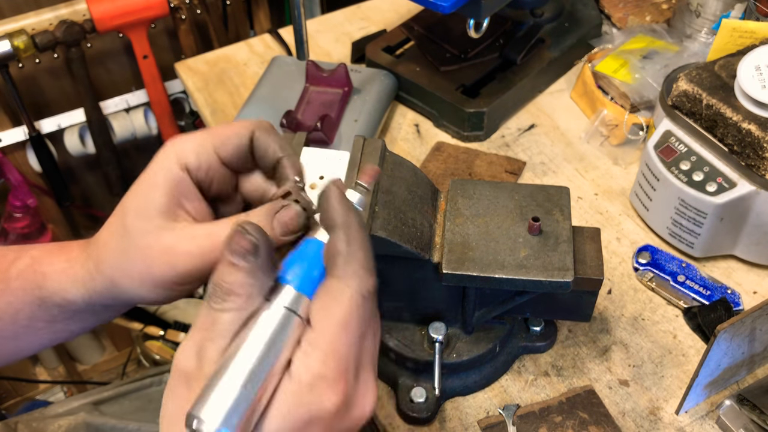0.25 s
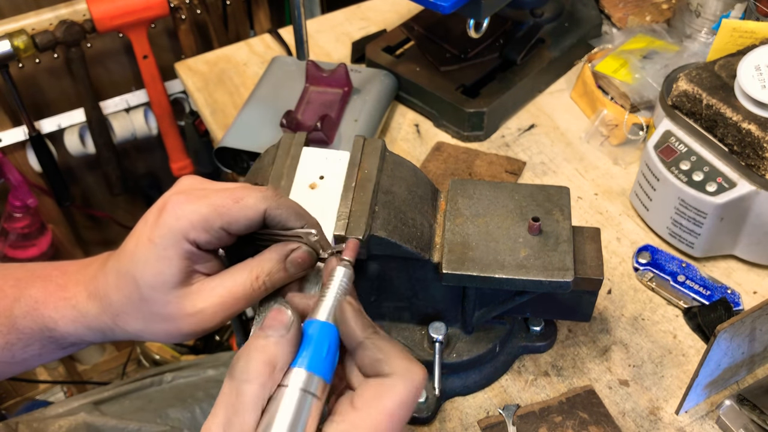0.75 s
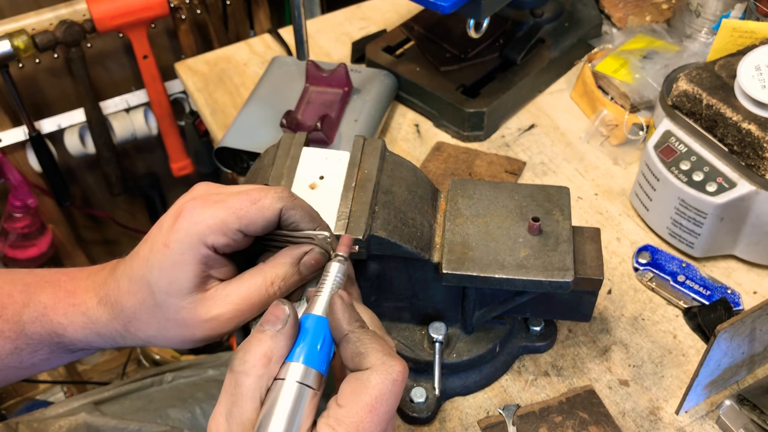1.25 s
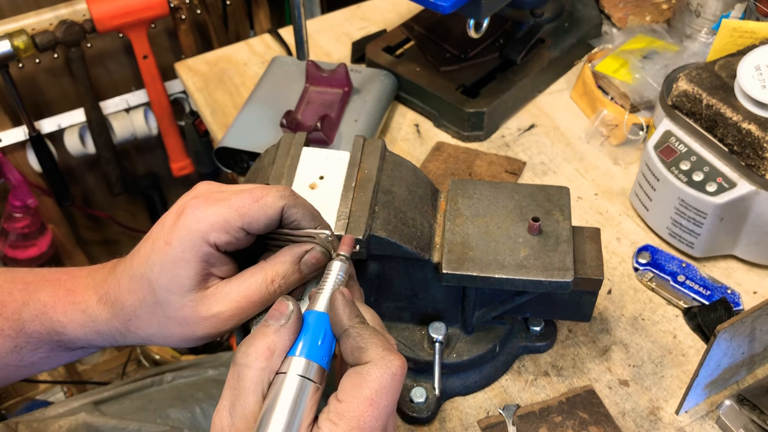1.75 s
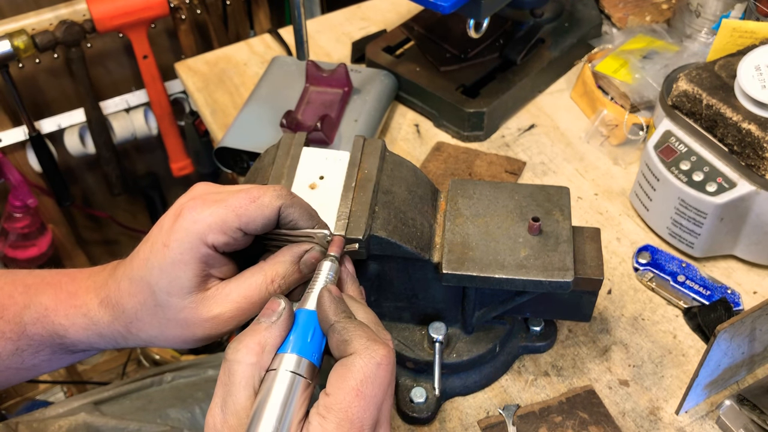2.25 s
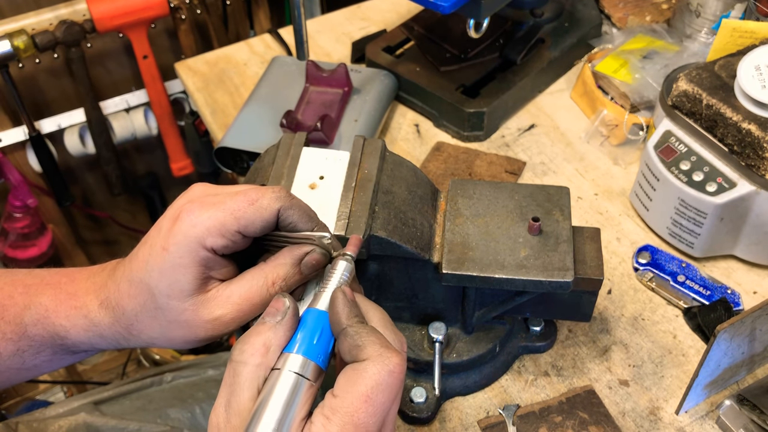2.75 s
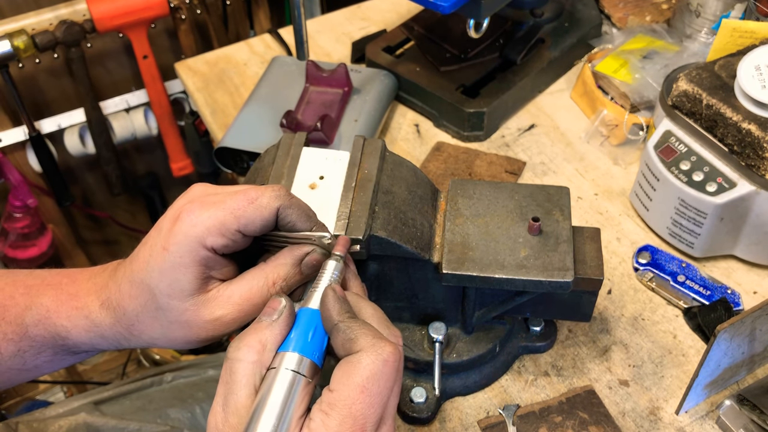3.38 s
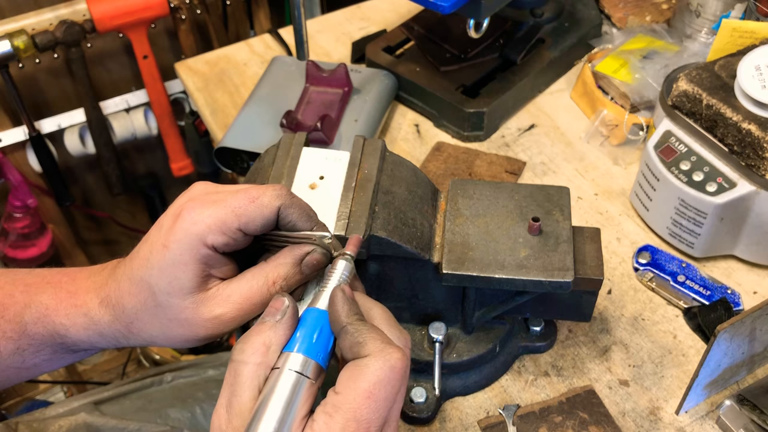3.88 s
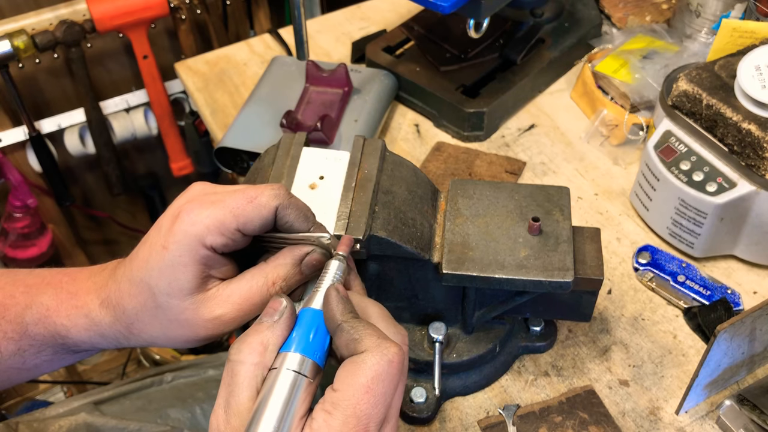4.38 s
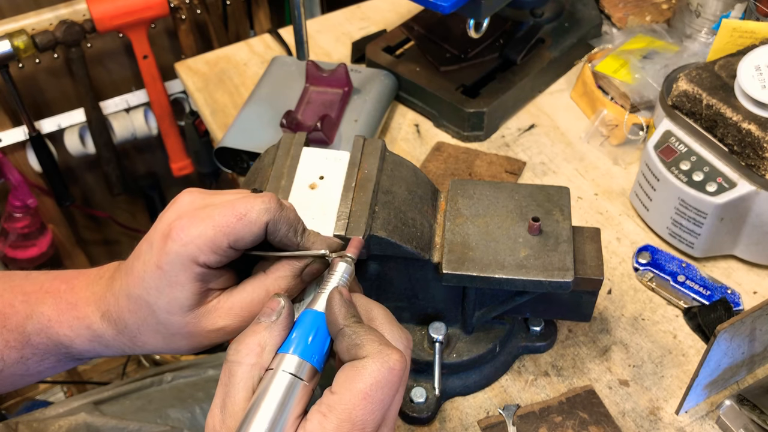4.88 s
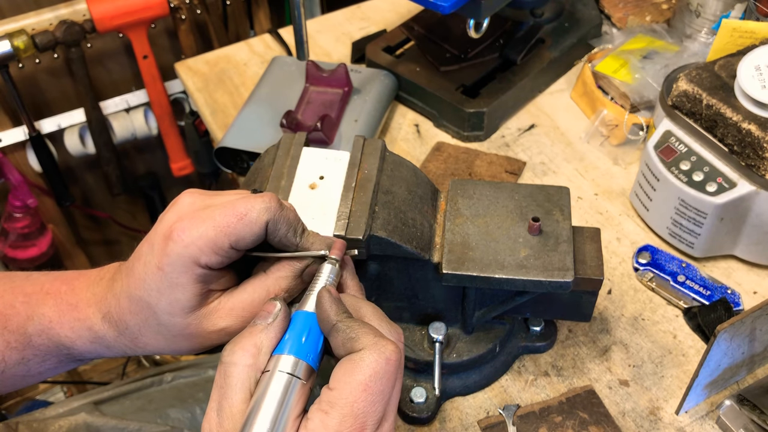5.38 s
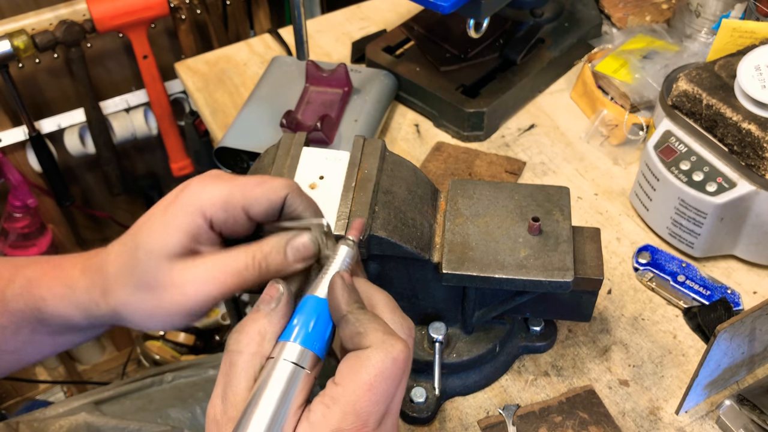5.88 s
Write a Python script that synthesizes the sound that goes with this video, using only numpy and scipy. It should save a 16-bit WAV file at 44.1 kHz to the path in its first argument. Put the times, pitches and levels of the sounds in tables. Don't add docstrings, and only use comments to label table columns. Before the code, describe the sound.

A handheld rotary tool whines steadily near the microphone, then a small abrasive bit rasps and buzzes on thin steel, its pitch sagging under pressure.

```python
import sys
import numpy as np
from scipy import signal
from scipy.fft import rfft, irfft, next_fast_len
from scipy.io import wavfile
from scipy.ndimage import uniform_filter1d, map_coordinates

SR = 44100
rng = np.random.default_rng(int(sys.argv[2]) if len(sys.argv) > 2 else 0)


def put_to_file(sound):
    columns = np.atleast_2d(sound).T
    safe = np.clip(columns, -1, 1)
    whole_steps = np.round(safe * 32767)
    wavfile.write(sys.argv[1], SR, whole_steps.astype(np.int16))


def ratio(d):
    e = np.asarray(d, float) / 20
    return 10 ** e


N = 270319
TIME = np.arange(N) / SR
TICKS = np.arange(0, N / SR + .01, .002)


def unit(x):
    return x / np.sqrt(np.mean(x ** 2) + 1e-20)


def fine(control):
    return np.array([np.interp(TIME, TICKS, c) for c in np.atleast_2d(control)]).squeeze()


def wobble(rate):
    knots = rng.standard_normal(2000)
    return fine(map_coordinates(knots, [TICKS * rate], mode="wrap"))


def filtered(x, response):
    m = next_fast_len(N + SR // 2)
    return irfft(rfft(x, m) * response(np.fft.rfftfreq(m, 1 / SR)), m)[..., :N]


def ringing(x, modes):
    def response(f):
        peaks = 0
        for k, (center, width, db) in enumerate(modes):
            damping = 1j * f * width
            peaks = peaks + (-1) ** k * ratio(db) * damping / (center ** 2 - f ** 2 + damping)
        low_side = (1j * f / (modes[0][0] + 1j * f)) ** 4
        high_side = 1 / (1 + 1j * f / modes[-1][0]) ** 2
        return peaks * low_side * high_side
    return unit(filtered(x, response))


def patchy(x, depth_db):
    z = signal.stft(x, nperseg=512)[2]
    field = uniform_filter1d(rng.standard_normal(z.shape), size=7, axis=0)
    field = uniform_filter1d(field, size=12, axis=1)
    return unit(signal.istft(z * ratio(depth_db * unit(field)), nperseg=512)[1][:N])


# start in seconds, drag on the shaft in Hz, pole hum in dB, twice-a-turn rub in dB.
PRESSURE = [(0.0, -0.8, -62, -73), (1.16, 8.7, -59.7, -82.0), (1.25, -1.08, -63, -83),
            (1.65, 20.5, -63, -63.0), (1.8, 8.5, -61.5, -64), (2.01, 35.6, -59.7, -58),
            (2.08, 16.1, -62, -63), (2.22, 38.5, -55.5, -69), (2.39, 70.5, -60, -67), (2.5, 75, -60, -70),
            (2.59, -1.18, -57.5, -77.2), (2.78, 29.5, -64.8, -62), (2.9, 5.5, -63.9, -67.0),
            (3.0, 29, -63, -59.5), (3.1, 11.5, -64, -61), (3.2, 29.5, -62, -62), (3.29, 109, -68, -71.2),
            (3.34, 32, -60, -67.9), (3.41, 56.5, -65, -68), (3.62, 45, -62, -75), (3.67, 2.2, -61, -78.6),
            (3.75, 1.6, -56, -78), (3.92, 21.0, -59.5, -70), (4.02, 11.5, -61.5, -68),
            (4.13, 35.5, -60, -62), (4.25, 29, -60, -64), (4.37, 54, -59, -72.4), (4.47, 43.5, -59, -74),
            (4.55, -0.3, -56, -77.8), (4.65, -0.3, -53, -77.8), (4.98, 17.5, -58, -77),
            (5.09, 10.5, -61, -71), (5.27, 32.5, -67, -55), (5.34, 40, -67, -55), (5.39, 104.5, -58, -70.8),
            (5.46, 86, -60, -60), (5.52, 58, -62, -64), (5.6, 105, -60, -64), (5.66, 58, -64, -72),
            (5.71, -1.8, -56, -77.6), (5.85, -1, -54.5, -77.6)]


def held(column):
    grip_s = .025
    starts, values = np.transpose(PRESSURE)[[0, column]]
    curve = values[0]
    for start, step in zip(starts[1:], np.diff(values)):
        curve = curve + step * np.clip((TICKS - start) / grip_s + .5, 0, 1)
    return curve


def lost_hz(lag_s=.12):
    keep, drag = np.exp(-TICKS[1] / lag_s), held(column=1)
    return drag[0] + signal.lfilter([1 - keep], [1, -keep], drag - drag[0])


def hum_db():
    return 8 + held(column=2) - 0.13 * lost_hz()


def whine_db():
    return 1.6 * (hum_db() + 47) - 48 - .1 * lost_hz()


def unload_db():
    return -.09 * np.maximum(lost_hz(lag_s=0.037) - held(column=1), 0)


# time in seconds, controller whistle in dB, motor hiss in dB,
# rattle toward the microphone in dB.
TURNING = [(0, -41, -35.5, 2.5), (.46, -46, -37, -0.5), (.72, -41.5, -37.5, 2), (.78, -41.5, -38, -3),
           (1.55, -41.5, -38, -6.5), (1.7, -41, -36, 3), (2.3, -48, -36.5, 1.5), (2.7, -41.5, -37, -0.5),
           (3.3, -54, -36.5, 0), (3.85, -44.5, -37, 0.5), (4.1, -47, -36, 1.5), (4.3, -52, -37, 0),
           (4.65, -46.5, -37, 2), (4.9, -45.5, -39.5, -4), (5.2, -50, -37, 3), (5.5, -65, -35, -1),
           (5.8, -49, -37.5, 5), (6.13, -54, -37.5, 2.5)]


def aim(column):
    return np.interp(TICKS, *np.transpose(TURNING)[[0, column]])


def shaft_hum(turns):
    angle, lost = 2 * np.pi * turns, lost_hz()
    unbalance = -59 - np.minimum(0.2 * lost, 7.5)
    rub = 1 + held(column=3)
    brush = -58 - np.minimum(0.54 * lost_hz(lag_s=0.88), 6)
    orders_db = fine([unbalance, rub, hum_db(), brush])
    orders_db = orders_db + [1.7 * wobble(14), 3 * wobble(12), 2.64 * wobble(15), 4 * wobble(10)]
    hum = sum(ratio(db) * np.sin((k + 1) * angle) for k, db in enumerate(orders_db))
    seventh_db = orders_db[3] - 4 + 3 * wobble(8)
    hum += ratio(seventh_db) * np.sin(7 * (angle + .05 * wobble(40)))
    cage_db = -74 - .4 * fine(lost) + 4 * wobble(7)
    return hum + ratio(cage_db) * np.sin(1.5 * angle + .6 * wobble(25))


WHINE_ORDERS = [5, 6, 7, 8, 11, 12, 13, 14, 16, 17, 20, 28, 30, 33, 35, 38]
WHINE_LEVELS = [-6, -6, -13, -9, -8, -2, -14, -6, -14, -14, -5, -9, -8, -6, -5, -7]


def commutator_whine(turns):
    angle = 2 * np.pi * turns
    effort_db = fine(whine_db()) + .5 * fine(aim(column=3))
    whine = np.zeros(N)
    for order, db in zip(WHINE_ORDERS, WHINE_LEVELS):
        level = ratio(effort_db + db + 1.6 * wobble(9))
        whine += level * np.sin(order * (angle + .011 * wobble(50)))
    return whine


def controller_whistle():
    phase = 2 * np.pi * 6982.6 * TIME + 0.092 * wobble(14)
    db = fine(aim(column=1))
    whistle = ratio(db + 1.4 * wobble(20)) * np.sin(phase)
    return whistle + ratio(db - 18 + 3 * wobble(3)) * np.sin(2 * phase)


# frequency in Hz, density in dB per Hz.
HISS_COLOR = [(30, -15), (150, -19.5), (300, -23.5), (600, -15.5), (1000, -10.5), (1250, -15.5), (1800, -5),
              (3450, -13), (4200, -6), (5300, -14), (6900, -4.5), (8600, -22), (10000, -11.5),
              (15700, -7.5)]
# resonance in Hz, width in Hz, level in dB.
SHELL = [(1256, 91, 0)]
# time in seconds, share of the hiss taken out.
VENT_SHADE = [
    (0, .15),
    (.2, .4),
    (1.04, .45),
    (1.1, 0),
]


def motor_hiss(turns):
    f, db = np.transpose(HISS_COLOR)
    color = lambda hz: ratio(np.interp(np.log(hz + 1), np.log(f), db))
    hiss = unit(filtered(rng.standard_normal(N), color))
    hiss = hiss + ratio(-11 - .08 * fine(lost_hz())) * ringing(rng.standard_normal(N), SHELL)
    shade = np.interp(TIME, *np.transpose(VENT_SHADE))
    hiss = hiss - shade * filtered(hiss, lambda hz: np.exp(-((hz - 5400) / 800) ** 2))
    throb = 1 + .12 * np.cos(2 * np.pi * turns)
    level = ratio(fine(aim(column=2)) + fine(unload_db()) + .8 * wobble(18))
    return level * patchy(throb * hiss, depth_db=1.5)


def motor(turns):
    tones = shaft_hum(turns) + commutator_whine(turns) + controller_whistle()
    return np.sqrt(2) * tones + motor_hiss(turns)


def blows(turns, scatter_db, jitter):
    whole = np.arange(1, int(turns[-1]))
    chance = rng.standard_normal((len(whole), 2))
    at = np.interp(whole + jitter * chance[:, 0], turns, np.arange(N))
    near = np.floor(at)[:, None] + np.arange(-7, 9)
    offset = near - at[:, None]
    click = np.sinc(offset) * np.cos(np.pi * offset / 16) ** 2
    force = ratio(scatter_db * chance[:, 1:])
    return np.bincount(np.clip(near, 0, N - 1).astype(int).ravel(), (force * click).ravel(), N)


def grit(turns, sharp, spiky_db):
    touch = np.exp(sharp * (np.cos(2 * np.pi * turns) - 1))
    return touch * ratio(spiky_db * rng.standard_normal(N)) * rng.standard_normal(N)


# start in seconds, length in seconds, knock in dB,
# sizzle in dB, sharp over deep buzz in dB.
DRAWS = [(1.136, .02, -49, -36, 0), (1.201, 0.024, -45, -32.5, 2), (1.665, .11, -43.5, -42, 1),
         (1.8, .07, -45, -44, 4), (1.985, .04, -36, -40, 2), (2.047, .045, -37.5, -36.5, -2),
         (2.166, 0.14, -38.6, -37.5, 2.5), (2.319, 0.048, -36.5, -36, 1), (2.392, 0.064, -35.5, -36.9, 0.5),
         (2.471, 0.069, -40, -38.5, 1), (2.551, .04, -41.5, -33, -7), (2.657, 0.095, -45, -39, -2),
         (2.803, .09, -44, -37, -1), (2.93, 0.055, -45.5, -45, 0), (3.015, .12, -38, -43, -1),
         (3.246, 0.026, -38.5, -36.5, 1), (3.286, 0.052, -36, -34.5, 0), (3.361, 0.042, -36.5, -37.5, -3.5),
         (3.429, 0.034, -37, -37, -7), (3.476, .1, -37, -41, 5), (3.591, .03, -40.5, -43, 4),
         (3.626, .02, -44.5, -30, 0), (3.675, .055, -53, -39, 0), (3.863, 0.079, -49, -39, 0),
         (3.972, 0.062, -46, -43, 4), (4.079, 0.073, -38.5, -49, 3), (4.158, 0.16, -37.8, -39.5, -2),
         (4.321, .12, -38.5, -38.5, -3), (4.465, .11, -40, -39.5, 2), (4.958, .12, -40.5, -34.5, 4),
         (5.141, 0.11, -45, -44.5, 5), (5.291, 0.067, -41, -41.5, 3), (5.384, 0.026, -35.5, -31, 3),
         (5.429, .075, -39, -36, 2), (5.539, 0.014, -37, -42.1, 1), (5.599, 0.061, -40, -41, 2),
         (5.659, .035, -44.5, -34, 3), (5.76, 0.077, -49, -48, 7), (5.879, .25, -50, -43, 4)]


def strokes(levels_db):
    attack_s, release_s = 0.016, .028
    power = 0
    for (s, length, *_), db in zip(DRAWS, levels_db):
        corners = [s - attack_s, s + attack_s / 2, s + length, s + length + release_s]
        power = power + ratio(2 * db) * np.interp(TICKS, corners, [0, 1, 1, 0]) ** 2
    return power


# idle rattle in dB, its loss per Hz of lost speed in dB,
# share of knock against sizzle, stroke level in dB.
GROUP_LEVELS = [
    (-46.5, -0.04, 1, 0),
    (-50, -.04, 0.74, -8.5),
    (-40.5, 0.06, 0.7, -3),
    (-52, .05, 0.0072, -1),
]


def contact():
    knock, sizzle = np.transpose(DRAWS)[2:4]
    power = []
    for idle, loss, share, db in GROUP_LEVELS:
        rattle = ratio(2 * (idle - loss * lost_hz() + unload_db()))
        power.append(rattle + strokes(share * knock + (1 - share) * sizzle + db))
    power = np.array(power)
    power[1:3] += ratio(2 * (whine_db() + np.array([[2], [8.5]])))
    power[2] *= ratio(aim(column=3))
    return fine(np.sqrt(power))


# frequency in Hz, width in Hz, level in dB.
KNOCK_MODES = [(1285, 115, 5), (1480, 1080, -4), (2120, 1270, -1), (2360, 1680, 1.5)]
SCRAPE_MODES = [(2940, 130, -2), (4090, 350, -0.5), (4546, 420, 2.5), (5900, 1400, -3)]
RASP_MODES = [(6900, 370, -3.5), (7690, 860, 1), (8200, 1500, -1.24)]
SIZZLE_MODES = [(10400, 1900, 2.5), (12500, 630, 5), (14660, 2600, 5.5), (16500, 1100, 5)]
# fast unevenness in dB of knock, scrape, rasp and sizzle.
UNEVENNESS = [.2, .4, 1.1, 1.6]


def bit(turns):
    levels = contact()
    buzzing = sum(ratio(2 * db + 4) for db in buzz_db())
    levels[0] = np.sqrt(np.maximum(levels[0] ** 2 - buzzing, .08 * levels[0] ** 2))
    struck_shares = [0.083, 0.45, 0.1, 0.2]
    groups = [KNOCK_MODES, SCRAPE_MODES, RASP_MODES, SIZZLE_MODES]
    chatter, flutter = wobble(22), wobble(95)
    strikes = blows(turns, scatter_db=2, jitter=0.004)
    sound = buzz(turns) + ringing_spells(turns)
    for level, share, modes, flutter_db in zip(levels, struck_shares, groups, UNEVENNESS):
        struck = ringing(strikes, modes)
        rubbed = patchy(ringing(grit(turns, sharp=0.17, spiky_db=6.5), modes), depth_db=1.66)
        uneven = ratio(0.7 * chatter + 1.1 * wobble(30) + flutter_db * flutter)
        sound = sound + level * uneven * (np.sqrt(share) * struck + np.sqrt(1 - share) * rubbed)
    return sound


def buzz_db():
    knock, sizzle, sharp = np.transpose(DRAWS)[2:]
    level = knock - 3 - .45 * np.maximum(sizzle - knock + 2, 0)
    steady = ratio(-2 * .2 * np.maximum(held(column=1) - 100, 0))
    surge = ratio(2 * (whine_db() - 7))
    power = [steady * strokes(level - np.maximum(tilt, 0)) + surge for tilt in (sharp, -sharp)]
    return fine(10 * np.log10(power))


# frequency in Hz, width in Hz, level in dB.
DEEP_MODES = [(1320, 200, -1), (1620, 380, 0)]
SHARP_MODES = [(1950, 260, -2), (2400, 330, 0), (2900, 400, -16)]


def buzz(turns):
    hand = .007 * wobble(35)
    strikes = blows(np.sort(turns + hand), scatter_db=1.5, jitter=.004)
    deep_db, sharp_db = buzz_db() + 1.5 * wobble(28)
    deep = ratio(deep_db) * patchy(ringing(strikes, DEEP_MODES), depth_db=2)
    return deep + ratio(sharp_db) * patchy(ringing(strikes, SHARP_MODES), depth_db=2.3)


# center in
# seconds, length in seconds, frequency in Hz, width in Hz, level in dB.
RINGING_SPELLS = [(.65, 0.072, 7600, 1500, -44), (1.17, .08, 4500, 600, -48), (1.4, 0.13, 4640, 500, -51),
                (1.74, 0.1, 4500, 700, -44.5), (2.45, 0.027, 4500, 900, -42),
                (2.548, 0.033, 4830, 500, -49), (2.72, 0.055, 4607, 600, -45.5),
                (2.854, 0.029, 11030, 698.5, -41), (3.305, .015, 1380, 251, -38.5),
                (3.31, .022, 6600, 1999, -34.5), (3.308, .025, 4200, 1500, -44),
                (3.44, 0.014, 7900, 900, -41), (3.46, 0.023, 3300, 600, -43.5),
                (3.635, .012, 4900, 350, -41), (3.709, 0.028, 10510, 1500, -43),
                (3.791, .035, 7600, 1500, -39.5), (3.803, .07, 4607, 900, -45),
                (4.62, 0.026, 7740, 499.6, -39), (5.02, 0.023, 4560, 1000, -41),
                (4.93, .07, 8300, 1500, -42), (5.395, 0.0084, 1398, 300.2, -37),
                (5.4, .015, 5500, 1500, -37), (5.499, .012, 1520, 250, -38.5),
                (5.5, 0.024, 6260, 1200, -39), (5.63, 0.037, 4300, 600, -40.5),
                (5.63, 0.029, 10710, 701, -48), (5.8, 0.046, 4810, 1200, -46),
                (5.82, 0.039, 7400, 1200, -41), (5.98, .06, 8200, 1200, -42), (5.69, .01, 11000, 4000, -40),
                (3.3, .02, 850, 300, -52), (3.37, .05, 900, 350, -54), (3.26, .012, 680, 200, -52),
                (.35, .25, 11900, 350, -53), (.95, .12, 11900, 350, -55), (1.5, .1, 11900, 400, -56),
                (4.75, .08, 7600, 1200, -44), (5.45, .04, 4400, 1200, -45), (5.72, .03, 300, 200, -64),
                (5.62, .05, 900, 300, -54),
                (.2, .15, 1280, 150, -52),
    (3.315, .02, 2400, 900, -43),
    (5.33, .03, 4700, 700, -46),
    (5.39, .005, 7000, 3500, -37),
    (5.67, .025, 15200, 900, -42),
    (5.93, .05, 8600, 500, -46),
    (6.07, .05, 8000, 1200, -43),
]


def ringing_spells(turns):
    push = unit(blows(turns, scatter_db=3, jitter=.006))
    push = push + 1.2 * unit(grit(turns, sharp=.8, spiky_db=4))
    sound = np.zeros(N)
    for s, length, hz, width_hz, db in RINGING_SPELLS:
        near = slice(max(int((s - 4 * length) * SR), 0), int((s + 4 * length) * SR))
        mode = signal.iirpeak(hz, hz / (1.5 * width_hz), SR)
        ring = unit(signal.lfilter(*mode, signal.lfilter(*mode, push[near])))
        sound[near] += ratio(db) * np.exp(-.5 * ((TIME[near] - s) / length) ** 2) * ring
    return sound


# start in seconds, length in seconds, multiple of the turn, level in dB.
SUNG_NOTES = [(1.66, .1, 7, -51), (1.89, .14, 6, -50), (1.99, .12, 8, -50), (2.17, .1, 9, -48),
              (2.18, .13, 8, -48), (2.19, .06, 12, -50), (2.33, .14, 8, -49), (2.37, .07, 12, -46),
              (2.41, .06, 9, -48), (2.5, .08, 9, -47), (2.52, .06, 14, -50), (2.66, .05, 6, -46),
              (2.8, .1, 6, -49), (2.98, .11, 9, -48), (3.01, .12, 8, -47), (3.01, .12, 11, -48),
              (3.02, .11, 6, -48), (3.03, .12, 7, -45.5), (3.33, .09, 8, -49), (3.42, .06, 9, -48),
              (3.47, .16, 13, -47), (3.48, .09, 9, -48), (3.48, .13, 8, -45), (3.49, .09, 11, -46),
              (4.09, .08, 11, -46), (4.09, .29, 9, -48), (4.12, .24, 6, -48), (4.12, .31, 8, -47),
              (4.15, .28, 7, -46), (4.21, .11, 11, -48), (4.4, .15, 12, -50), (4.68, .12, 14, -53),
              (4.74, .23, 12, -50), (4.7, .22, 20, -50.5), (5.03, .06, 8, -48), (5.14, .07, 9, -48),
              (5.25, .16, 8, -48), (5.31, .06, 10, -49), (5.42, .14, 9, -47), (5.45, .06, 13, -47),
              (5.54, .06, 14, -48), (5.58, .05, 12, -47), (5.6, .06, 8, -47), (5.6, .06, 6, -53),
              (5.63, .05, 12, -48), (5.55, .1, 4, -58), (5.9, .12, 14, -54), (5.9, .12, 12, -52),
              (6.03, .09, 11, -47), (6.08, .05, 12, -47)]


def sings(turns, tool):
    swell_s, lock_s = .03, .045
    sound = np.zeros(N)
    for s, length, multiple, db in SUNG_NOTES:
        end = s + length
        near = slice(int((s - swell_s) * SR), int((end + swell_s) * SR))
        corners = [s - swell_s, s + swell_s / 2, end - swell_s / 2, end + swell_s]
        swell = np.interp(TIME[near], corners, [0, 1, 1, 0])
        waver_db = 2 * np.sin(2 * np.pi * (rng.uniform(8, 22) * TIME[near] + rng.random()))
        spin = np.exp(2j * np.pi * multiple * turns[near])
        mixed = 2 * tool[near] / spin
        line = [1, 1j] @ uniform_filter1d([mixed.real, mixed.imag], size=int(lock_s * SR), axis=1)
        wanted = np.sqrt(2) * ratio(db + 2.3 + waver_db)
        sound[near] += swell * np.real((wanted / (abs(line) + 1e-9) - 1) * line * spin)
    return sound


def bench(x):
    t = np.arange(SR // 4) / SR
    tail = rng.standard_normal(len(t)) * ratio(-60 * t / 0.1) * (t > .003)
    return x + ratio(-10) * signal.fftconvolve(x, tail / np.linalg.norm(tail))[:N]


def scene():
    free_hz = 235.94
    turns = np.cumsum(fine(free_hz - lost_hz())) / SR
    tool = motor(turns) + bench(bit(turns))
    return np.tile(tool + sings(turns, tool), (2, 1))


def top_cut(x):
    return signal.sosfilt(signal.butter(12, 17060, fs=SR, output="sos"), x)


def record(dry):
    microphone = lambda hz: (hz < 15720) * (1j * hz / (60 + 1j * hz)) ** 2
    return top_cut(filtered(dry, microphone))


dry = scene()
out = record(dry)
put_to_file(out)
```